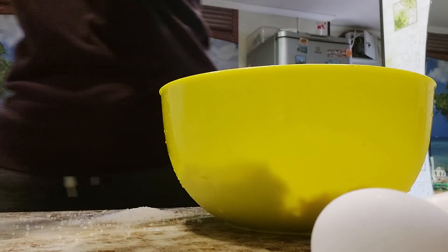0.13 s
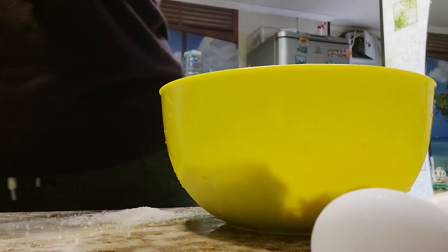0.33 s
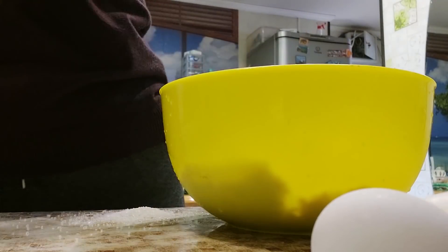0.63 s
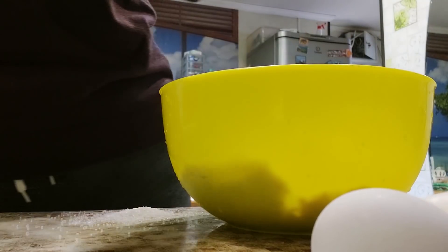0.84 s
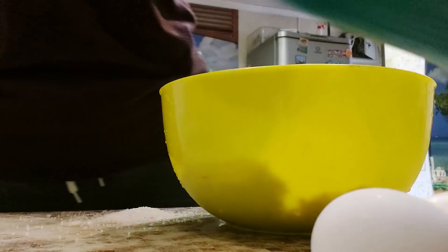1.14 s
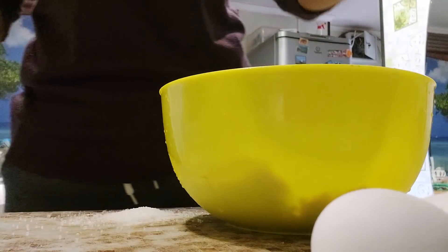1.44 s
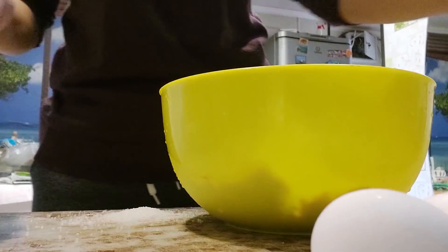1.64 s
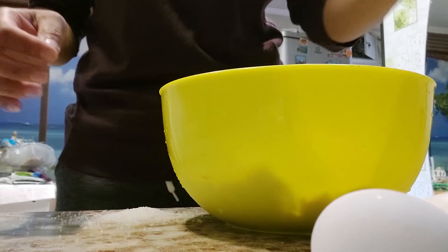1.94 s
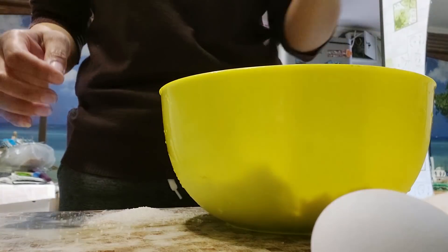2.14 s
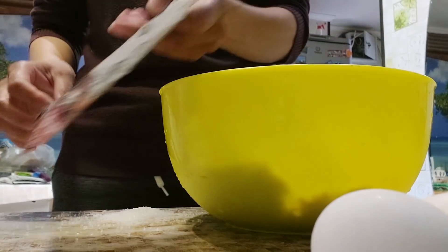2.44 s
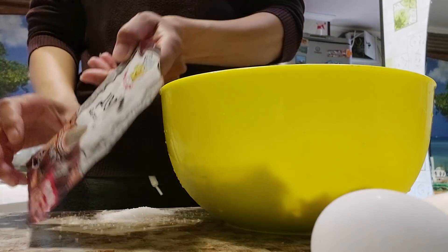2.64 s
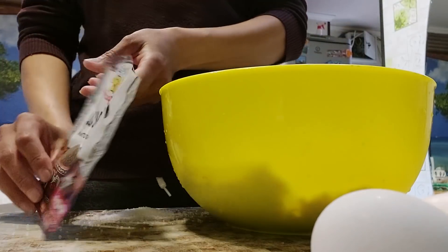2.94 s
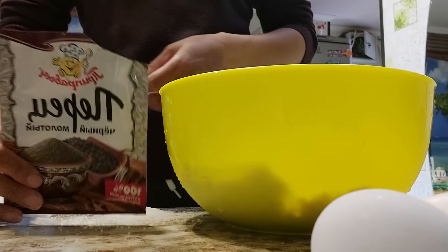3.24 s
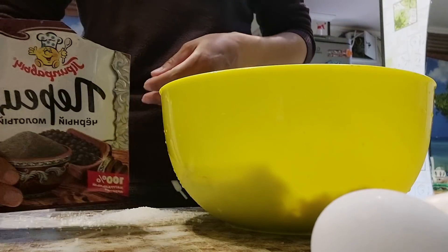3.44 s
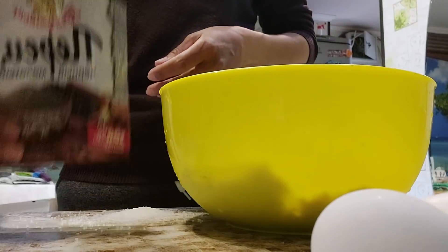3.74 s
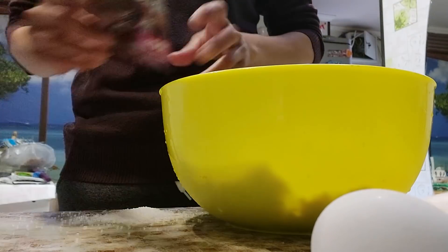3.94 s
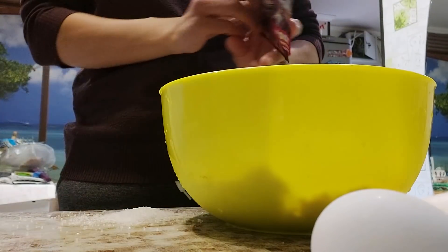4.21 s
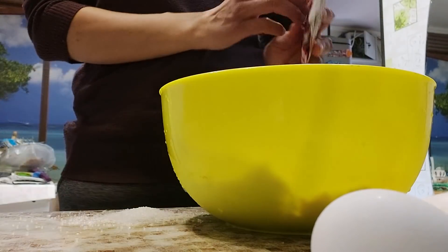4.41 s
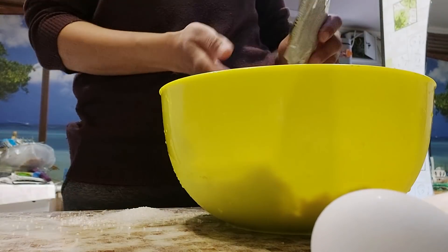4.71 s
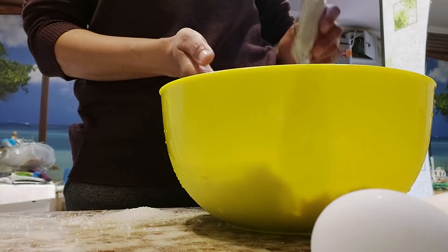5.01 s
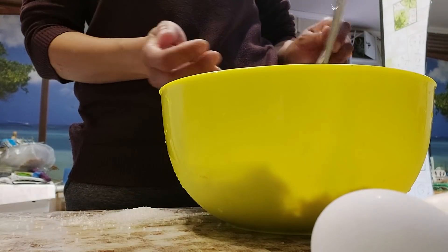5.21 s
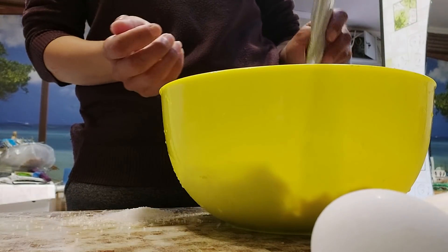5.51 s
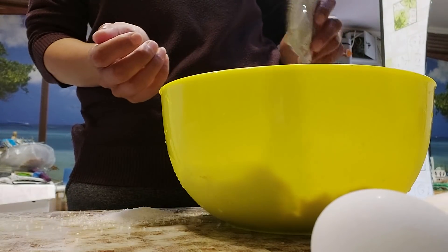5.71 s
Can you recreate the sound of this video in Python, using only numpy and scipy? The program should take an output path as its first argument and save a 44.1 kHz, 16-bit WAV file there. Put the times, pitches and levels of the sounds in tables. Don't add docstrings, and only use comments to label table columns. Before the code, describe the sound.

In a small quiet kitchen, very close to a stereo microphone, things are dragged and knocked on the counter with hard cracks, plastic snaps and low booms, clipping at the loudest. A heavy grinding scrape follows, then lighter settling taps. A foil packet swishes and lands, snaps sharply, crinkles softly, and finally spice hisses out in short shakes.

```python
import sys
import numpy as np
from scipy import signal
from scipy.fft import rfft, irfft
from scipy.io import wavfile

SR = 44100
rng = np.random.default_rng(int(sys.argv[2]) if len(sys.argv) > 2 else 0)


def volts_from_decibels(level):
    exponent = np.asarray(level, float) / 20
    return 10 ** exponent


def generate_wav(signal):
    frames = np.transpose(np.atleast_2d(signal))
    scaled = np.clip(frames, -1, 1) * 32767
    pcm = np.round(scaled).astype(np.int16)
    wavfile.write(sys.argv[1], SR, pcm)


N = 258426
PORT_LAG = 14


def rms_one(x):
    return x / np.sqrt(np.mean(x ** 2) + 1e-20)


def at_hz(points, hz):
    points = np.array(points)
    return np.interp(np.log(hz), np.log(points[:, 0]), points[:, 1])


def drift(rate_hz):
    pole = np.exp(-2 * np.pi * rate_hz * 40 / SR)
    noise = rng.standard_normal(N // 40 + 2002)
    slow = signal.lfilter([1], [1, -2 * pole, pole * pole], noise)[2000:]
    return np.interp(np.arange(N) / 40, np.arange(len(slow)), rms_one(slow))


def resonate(x, hz, width_hz):
    r = np.exp(-np.pi * width_hz / SR)
    feedback = [1, -2 * r * np.cos(2 * np.pi * hz / SR), r * r]
    return signal.lfilter(np.array([1, 0, -1]) * (1 - r * r) / 2, feedback, x + 1e-18)


def band(x, low_hz, high_hz):
    edges_hz = [low_hz, min(high_hz, 0.45 * SR)]
    return signal.sosfilt(signal.butter(2, edges_hz, "band", fs=SR, output="sos"), x)


def panned(db):
    return volts_from_decibels(np.array([db / 2, -db / 2]))


def grains(per_s, spread_db):
    size = volts_from_decibels(spread_db * np.minimum(rng.exponential(1, N), 4)) * rng.choice([-1, 1], N)
    return size * (rng.random(N) < per_s / SR)


def strokes(start_s, swell_s, hold_s, release_s, level_db):
    t = np.arange(0, N + 32, 32)[:, None] / SR
    before = (start_s - t) / np.maximum(swell_s, 0.002)
    after = (t - start_s - hold_s) / np.maximum(release_s, 0.002)
    away = np.maximum(np.maximum(before, after), 0)
    power = np.sum(volts_from_decibels(level_db - 20 * away) ** 2, axis=1) + 1e-11
    return np.interp(np.arange(N) / SR, t[:, 0], 10 * np.log10(power))


# time_s, left_right_db
PLACE = [(0.0, -1.5), (0.21, 1), (0.9, 1.5), (1.0, -1), (1.16, -4), (1.39, -6.5), (2.03, -5.5),
         (2.09, -2.5), (2.2, -6.5), (2.48, -4.5), (2.64, -12.5), (2.89, 0), (4.6, -2.5), (5.86, -2.5)]


def hands_side_db(time_s):
    return np.interp(time_s, *np.transpose(PLACE))


# frequency_hz, density_db
AIR = [(41, -31.5), (70, -6), (255, -16.5), (298, -11), (401, -17.5), (449, -7.5), (550, -21.5),
       (1060, -26), (1600, -27.5), (7280, -34), (12800, -18.5), (14700, -24.5), (15700, -45)]


def air():
    air_db, hum_hz, hum_db = -61, 49, -58.5
    hz = np.maximum(np.arange(N // 2 + 1) * SR / N, 1)
    hiss = irfft(rfft(rng.standard_normal((2, N))) * volts_from_decibels(at_hz(AIR, hz)), N)
    hum = np.sin(2 * np.pi * hum_hz * np.arange(N) / SR) * volts_from_decibels(hum_db + drift(3.0))
    return volts_from_decibels(air_db) * rms_one(hiss) + hum


def kitchen(x):
    t60_s, level_db = 0.16, -14
    t = np.arange(SR // 2) / SR
    tail = band(rng.standard_normal((2, len(t))), 130, 21000) * volts_from_decibels(-60 * t / t60_s) * (t > 0.004)
    return volts_from_decibels(level_db) * signal.fftconvolve(x, tail / np.sqrt(np.sum(tail ** 2) / 2), axes=1)[:, :N]


# start_s, peak_db, pitch_hz, t60_s
THUMPS = [(0.056, -7.5, 401, 0.09), (0.262, 2, 185, 0.051), (0.393, 10.5, 274, 0.015),
          (0.466, -10.5, 125, 0.096), (0.592, -13, 141, 0.1), (0.853, -24.5, 357, 0.37),
          (0.949, -16.5, 346, 0.16), (0.974, -18, 330, 0.22), (1.353, -27, 146, 0.051),
          (1.42, 3, 118, 0.093), (1.497, -16, 74.6, 0.37), (1.768, -25.5, 113, 0.066),
          (1.852, -10.5, 158, 0.057), (2.034, -14, 104, 0.041), (2.086, -9.5, 123.7, 0.11),
          (2.108, -8.5, 206, 0.066), (2.263, -30, 143.5, 0.15), (2.35, -32, 149, 0.052),
          (2.447, -19, 471, 0.042), (2.508, -20, 304, 0.05), (2.549, -27, 116, 0.11),
          (2.631, -24.5, 304, 0.074), (2.689, -24, 116, 0.078), (2.853, -23, 110, 0.064),
          (2.914, -21.5, 97.3, 0.15),
          (3.103, -14, 296.5, 0.15),
    (3.141, -20, 87.5, 0.089),
    (3.964, -16, 282, 0.043),
    (4.16, -29.5, 65.5, 0.17),
    (4.59, -35, 421, 0.14),
    (5.171, -37, 388, 0.22),
    (5.32, -29.5, 83.6, 0.15),
          (1.841, -16, 304, 0.045),
    (1.91, -19.5, 253, 0.057),
    (1.943, -13, 243, 0.041),
    (2.415, -31, 276, 0.048),
    (2.487, -30, 230, 0.037),
    (2.584, -30, 325, 0.066),
    (2.648, -24.5, 258, 0.049),
    (2.754, -29.5, 151.5, 0.055),
    (2.789, -38, 151, 0.072),
    (2.86, -28, 323, .05),
]


def thumps():
    out, t = np.zeros(N + 30000), np.arange(20000) / SR
    for start_s, peak_db, hz, t60_s in THUMPS:
        upper = 0.38 * np.sin(2 * np.pi * 1.3 * hz * t) * volts_from_decibels(-30 * t / t60_s)
        swing = np.sin(2 * np.pi * hz * t) + upper
        push = 1 - np.exp(-t / 0.0044)
        out[round(start_s * SR):][:len(t)] += volts_from_decibels(peak_db - 4.5 - 60 * t / t60_s) * push * swing
    return out[:N]


# start_s, swell_s, hold_s, release_s, level_db
GRINDS = [
    (1.325, 0.035, .03, .08, -22.5),
    (1.369, .03, 0.045, .09, -16),
    (1.462, 0.012, 0.017, .1, -24.5),
    (1.53, .04, 0.059, .1, -38.5),
    (2.991, 0.052, 0.065, .03, -50),
    (.05, .02, 0.2, .1, -41),
]


def grinding():
    level = volts_from_decibels(strokes(*np.transpose(GRINDS)))
    body = band(band(grains(2500.0, spread_db=3.0), 340, 870), 250, 1100)
    slips = level * rms_one(body)
    return np.array([np.roll(slips, 2 * PORT_LAG), slips])


# start_s, hold_s, release_s, force_db, weight_db (deep modes re upper)
DRAGS = [(0.04, 0.2, 0.26, -30.5, -7), (0.256, 0.135, 0.044, -27, -7), (0.427, 0.012, 0.11, -30, -3),
         (0.596, 0.17, 0.088, -34.5, 1.5), (0.713, 0.08, 0.02, -27, 0), (0.854, 0.018, 0.079, -34.5, -9),
         (0.946, 0.0085, 0.088, -27.5, -7), (1.097, 0.0042, 0.083, -42.5, -8),
         (1.308, 0.032, 0.086, -28, -6.5), (1.341, 0.081, 0.1, -16.5, 2.5),
         (1.773, 0.012, 0.086, -43, 10.5), (1.85, 0.097, 0.07, -35, 2), (2.028, 0.018, 0.035, -39.5, -7),
         (2.093, 0.0078, 0.043, -28, 4.5)]
# start_s, hold_s, release_s, force_db, weight_db
NUDGES = [(2.261, 0.035, 0.068, -59, 6), (2.35, 0.011, 0.062, -50, 2), (2.452, .02, 0.082, -44.5, -3),
          (2.542, 0.021, 0.048, -55.5, 19), (2.639, 0.0082, 0.046, -47.5, 1.5),
          (2.757, 0.024, 0.14, -55, 8.5), (2.859, 0.097, 0.059, -45.5, -7), (2.986, 0.08, 0.15, -50.5, -4),
          (3.113, 0.02, 0.047, -32.5, -8.5), (3.962, 0.022, 0.077, -42.5, -1.5),
          (4.16, 0.026, 0.069, -53.5, 1), (4.22, 0.16, .06, -67, -6), (4.429, .02, 0.057, -61, -4),
          (4.534, 0.11, 0.11, -64, -8), (5.18, 0.019, .05, -59.5, -12), (5.317, 0.03, 0.05, -76.5, 28),
          (5.471, 0.012, 0.075, -67, 5.5)]


def pressing():
    start_s, hold_s, release_s, force_db, weight_db = np.transpose([*DRAGS, *NUDGES])
    grip_s = 0.009
    deep_db = strokes(start_s, grip_s, hold_s, release_s * 1.3, force_db + weight_db)
    return deep_db, strokes(start_s, grip_s, hold_s, release_s, force_db)


# frequency_hz, width_hz, level_db
COUNTER = [(63, 44, -3), (96, 12, -4), (125, 8, -1.5), (172, 81, -7.5), (258, 32, 0.5), (320, 40, -1),
           (402, 41, -1), (447, 120, -1.5), (560, 350, -3), (752, 90, -7.5)]


def counter_boom(deep_db, boom_db):
    shared = grains(1500.0, spread_db=3.5) * volts_from_decibels(0.75 * drift(23.0))
    differing = grains(600.0, spread_db=2.5)
    slips = band([shared, differing], 23, 710)
    out = 0
    for k, (hz, width_hz, mode_db) in enumerate(COUNTER):
        deep = hz < 150
        mid, side = rms_one(resonate(band(slips, 30, 330) if deep else slips, hz, width_hz))
        level_db = (deep_db if deep else boom_db) + mode_db - 4.5 + 4.24 * drift(3.0)
        out = out + volts_from_decibels(level_db) * (mid * (-1) ** k + hz / 600 * side * [[1], [-1]])
    return out


# start_s, end_s, pitch_hz
RUBS = [(.12, .25, 4400), (.12, .22, 6500), (.40, .56, 4300), (.34, .39, 2750), (4.81, 4.96, 5900),
        (5.325, 5.42, 2270), (3.03, 3.105, 12000), (3.07, 3.1, 3800), (3.85, 3.96, 11000),
        (4.41, 4.47, 4400), (4.57, 4.63, 2700), (4.62, 4.77, 4200), (4.96, 5.07, 4300), (5.47, 5.51, 4500),
        (5.63, 5.72, 2800), (.59, .64, 1300), (1.57, 1.6, 1100), (.46, .58, 7000)]
RUB_DB = [-34, -35.5, -36.5, -22.5, -66.5, -56, -28.5, -32, -55.5, -62, -63.5, -62, -64, -57, -63.5, -27.5,
          -45, -42.5]
RUB_WIDTH_HZ = [410, 410, 410, 410, 701, 410, 3500, 900, 4000, 900, 500, 1200, 900, 600, 499, 350, 250,
                4000]


def rubs():
    out = np.zeros((2, N))
    slips = np.array([grains(4200.0, spread_db=3.5), grains(1300.0, spread_db=4.5)])
    for (start_s, end_s, hz), level_db, width_hz in zip(RUBS, RUB_DB, RUB_WIDTH_HZ):
        span = slice(round(start_s * SR), round(end_s * SR))
        sung = resonate(resonate(slips[:, span], hz, width_hz), hz, width_hz)
        swell = np.sin(np.linspace(0, np.pi, sung.shape[1]))
        out[:, span] += volts_from_decibels(level_db) * rms_one(sung) * swell
    return out


def hit_sound(noise, peak_db, hz, dull_db, dull_hz):
    t = np.arange(noise.shape[1]) / SR
    both = noise[0] + 3.0 * noise[1:]
    burst = both * (volts_from_decibels(-60 * t / 0.0089) + 0.45 * volts_from_decibels(-60 * t / 0.069))
    ringing = both * (volts_from_decibels(-60 * t / 0.023) + 0.08 * volts_from_decibels(-60 * t / 0.047))
    second_hz = hz * 3.4 if hz < 3000 else hz * 0.67
    rings = resonate(ringing, hz, 140.0 + 0.063 * hz) + 0.21 * resonate(burst, second_hz, 2200.0)
    port = 0.96 * resonate(burst, 9900, 11000)
    bright = band(burst, 1200, 6200) + port + 3.5 * rings
    soft_top_hz = min(13000.0, 39000.0 * volts_from_decibels(0.35 * peak_db))
    bright = band(bright, 300, np.clip(max(1.3 * hz, soft_top_hz), 1000, 0.44 * SR))
    knock = both * (volts_from_decibels(-60 * t / 0.02) + 0.25 * volts_from_decibels(-60 * t / 0.1))
    dull = band(knock, 270, 1700) + 2.0 * resonate(knock, dull_hz, 130.0)
    hit = bright / np.abs(bright).max() + volts_from_decibels(dull_db) * dull / np.abs(dull).max()
    return volts_from_decibels(peak_db + 1.5) * hit


# start_s, peak_db, ring_hz, dull_db (re peak)
SNAPS = [(0.2608, -5.5, 1484, -14), (0.3535, -1, 2850, -28), (.4379, -8.5, 2720, -24),
         (.465, -17, 4150, -15), (0.6822, -8, 2770, -38), (0.7025, -6.5, 4700, -29),
         (0.712, -10, 4934, -28.5), (0.781, -6, 3500, -16), (0.9073, -13.5, 11160, -17),
         (1.086, -1, 10730, -10), (1.2809, -19.5, 1960, -32), (1.3095, -12.5, 1980, -17),
         (1.7692, -39.5, 11400, -2), (1.83, -40.5, 1603, -18), (1.8533, -18, 1980, -13),
         (1.887, -25, 2470, -8), (1.986, -21, 2704, -25), (2.5453, -45.5, 10010, -12.5),
         (2.798, -38.5, 1970, -18), (2.8514, -40, 2350, -18.5), (3.1395, -17.5, 2360, -28),
         (3.3481, -34.5, 11420, -11.5), (3.953, -25, 2216, -8.5), (3.9652, -3.5, 2070, -17.5),
         (4.157, -36, 3670, -25), (4.582, -45.5, 5586, -32.5), (5.5808, -44, 10150, -15),
         (5.6356, -32.5, 11100, -35),
         (.1437, -24, 4640, -18), (.218, -18, 4100, -21), (.2505, -14, 5410, -21), (.281, -10, 4000, -28),
         (.3095, -6.5, 4470, -29), (.336, -9.5, 6000, -23), (.368, -12.5, 1290, -18),
         (.551, -28.5, 1800, -6), (.5718, -24.5, 1300, -12), (.6162, -15, 4840, -21),
         (.633, -15, 3500, -16), (.655, -18, 1800, -18), (.752, -13.5, 2790, -13), (.77, -14.5, 1250, -8.5),
         (1.372, -6, 2000, -4), (1.665, -64, 1640, -2.5), (1.806, -44.5, 1600, -9), (1.879, -29, 5050, -25),
         (1.913, -30, 3500, -13.5), (1.94, -30, 2650, -11), (2.212, -47, 3500, -25), (2.261, -58, 1597, -3),
         (3.0645, -24, 9010, -30), (3.082, -23.5, 3800, -29.5), (3.868, -54.5, 1200, -9),
         (3.931, -50, 1500, -9.5), (1.337, -5, 4310, -15), (1.383, -3, 2200, -6), (1.394, -4, 4500, -10),
         (1.416, -8, 3000, -3), (1.46, -14, 1900, -2), (1.485, -24, 1700, -5), (.296, -10, 3000, -20),
         (.324, -10, 4300, -20), (.388, -13, 3500, -15), (3.9657, -7, 7600, -30), (2.507, -51.5, 1200, 4),
         (2.584, -56, 1200, 3)]
# start_s, peak_db, ring_hz, dull_db (re peak), dull_ring_hz
KNOCKS = [(.0408, -38, 3570, 0, 401), (.5876, -12.5, 1290, -6, 487), (.7268, 1.5, 1300, -10.5, 1200),
          (.8475, -15.5, 1330, 0, 404), (0.861, -20, 10270, 2.5, 401), (.9018, -14, 1390, -11.5, 1270),
          (.9827, -28, 1280, 4.5, 408), (1.0246, -31, 1290, 13, 800), (1.6521, -50, 1570, 12, 405),
          (2.0313, -32, 1230, 8.5, 630), (2.0867, -11, 1390, -1, 560), (2.3477, -54.5, 1560, 10.5, 546),
          (2.4448, -38, 2320, 1, 465), (2.487, -57, 1971, 8, 439), (2.6334, -32, 2180, -21, 410),
          (2.6923, -52, 1620, 7.5, 405), (2.756, -53.5, 1840, -11, 436), (2.8704, -38, 2380, -3, 420),
          (2.8928, -24.5, 2360, -6.5, 770), (2.9164, -32.5, 1200, 4.5, 433), (3.1043, -8, 3980, 2.5, 850),
          (4.6004, -39.5, 2670, -3.5, 420), (5.1701, -30, 2730, -3.5, 404)]


def snaps():
    out, length = np.zeros((2, N + 9000)), 8000
    snap_dull_hz = 470
    hits = [(*row, snap_dull_hz) for row in SNAPS] + [*KNOCKS]
    for start_s, *character in hits:
        pan_db = 0.36 * hands_side_db(start_s)
        hit = hit_sound(rng.standard_normal((3, length)), *character) * panned(pan_db)[:, None]
        for side in range(2):
            far = (pan_db < 0) == (side == 0)
            at = round(start_s * SR) + PORT_LAG * far
            out[side, at:at + length] += hit[side]
    return out[:, :N]


# peak_s, swell_s, release_s, hiss_db, scrape_db (re hiss)
SCRAPES = [(0.058, 0.02, 0.48, -39, -17.5), (0.201, 0.11, 0.63, -29, -19.5),
           (0.267, 0.042, 0.21, -12.5, -15), (0.361, 0.16, 0.074, -15, -8), (0.469, 0.36, 0.035, -27.5, -5),
           (0.591, 0.0067, 0.049, -28, -2), (0.639, 0.076, 0.075, -21.5, -19),
           (.715, 0.029, 0.042, -23, -19), (0.776, 0.7, 0.076, -25.5, -3.5), (.855, 0.014, 0.092, -39, 4),
           (.96, 0.04, 0.16, -45.5, 3), (1.106, 0.012, 0.1, -35, -17), (1.343, 0.029, 0.12, -10.5, -6.5),
           (1.39, 0.048, 0.072, -12.5, -3), (1.775, 0.012, 0.029, -55.5, -5), (1.858, .04, 0.25, -40, 3),
           (1.95, 0.15, 0.17, -42, -8), (2.099, 0.017, 0.082, -43, -1.5)]
# peak_s, swell_s, release_s, hiss_db, scrape_db (re hiss)
RUSTLES = [(2.3, .3, .08, -62, -28), (2.455, 0.019, .09, -63, 1.5), (2.555, 0.018, .06, -58.5, -36),
           (2.65, 0.026, 0.23, -67.5, -11), (2.891, .07, .08, -46, -8.5), (3.02, 0.063, 0.16, -29, -9.5),
           (3.078, 0.08, 0.06, -26, -17), (3.144, .04, .05, -44.5, 8.5), (3.27, 0.1, 0.14, -61, -24),
           (3.354, 0.053, .1, -61.5, -9.5), (3.93, 0.06, .2, -63, -7), (3.986, .03, .14, -36, -18.5),
           (4.079, 0.11, .08, -53.5, 2), (4.17, .08, 0.16, -56, 0), (4.438, .12, .12, -47, -6),
           (4.6, 0.054, .2, -57, 1), (4.691, .2, .2, -54, -13.5), (5.032, .5, .05, -57, -14),
           (5.2, 1.7, 0.83, -65, -12), (5.177, 0.0109, 0.089, -50, 13.5)]
# peak_s, hiss_db
SHAKES = [
    (5.336, -47.5),
    (5.484, -43.5),
    (5.64, -41.5),
    (5.776, -39),
]


def rustling():
    shakes = []
    for peak_s, hiss_db in SHAKES:
        for longer, loss_db in [(1, 0), (6.4, -13.5)]:
            shakes.append((peak_s, 0.028 * longer, 0.04 * longer, hiss_db + loss_db, -23))
    peak_s, swell_s, release_s, hiss_db, scrape_db = np.transpose([*SCRAPES, *RUSTLES, *shakes])
    release_s = release_s * 0.88
    scrape = strokes(peak_s, swell_s, 0, release_s, hiss_db + scrape_db)
    return scrape, strokes(peak_s, swell_s, 0, release_s, hiss_db)


# frequency_hz, density_db
FOIL = [(350, -34), (600, -3), (747, -4.5), (844, -7.5), (1970, -5.5), (2260, 3), (2660, -10),
        (4730, -12.5), (7320, -18.5), (10600, -14.5), (15700, -19.5)]
# frequency_hz, density_db
SPICE = [(600, -9), (1500, -5), (2600, -3), (4400, -5), (7000, -5.5), (11000, -2), (15700, -9.5)]


def crinkle(scrape_db, hiss_db):
    t = np.arange(N) / SR
    clumps = 0.8 * drift(40.0) + 0.7 * drift(200.0)
    spice = np.clip((t - 4.0) * 20, 0, 1)
    tear = np.abs(t - 3.025) < 0.075
    even = np.maximum(spice, tear)
    spread_db = 2.6 * (1 - even)
    steady = np.sqrt(1 - spread_db * np.log(10) / 10)
    clicks = [[rms_one(grains(3000.0, spread_db) * steady) for _ in range(2)] for _ in range(2)]
    out = 0
    for k, hz in enumerate(630 * 2 ** (np.arange(15) / 3)):
        colour_db = (1 - spice) * (at_hz(FOIL, hz) + 18.61) + spice * (at_hz(SPICE, hz) + 9.76)
        patch_db = (1 - 0.6 * even) * (1.9 * clumps + 2.0 * drift(15.0))
        high = np.clip(np.log(hz / 2200) / np.log(2), 0, 1)
        level_db = (1 - high) * scrape_db + high * hiss_db + colour_db + patch_db
        out = out + volts_from_decibels(level_db) * band(clicks[k % 2], hz * 2 ** (-1 / 6), hz * 2 ** (1 / 6))
    return out


def scene():
    hands = counter_boom(*pressing()) + crinkle(*rustling()) + 0.9 * thumps() + grinding()
    hands = hands * panned(hands_side_db(np.arange(N) / SR))
    hits = snaps()
    return hands + hits + kitchen(hits + 0.5 * hands) + rubs() + air()


def top_cut(x):
    return signal.sosfilt(signal.butter(12, 15880, fs=SR, output="sos"), x)


def record(dry):
    heard = signal.sosfilt(signal.butter(4, 40, "high", fs=SR, output="sos"), dry)
    return top_cut(np.clip(heard, -1, 1))


dry = scene()
out = record(dry)
generate_wav(out)
```